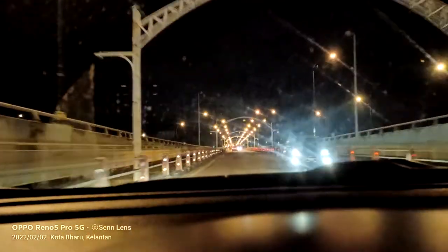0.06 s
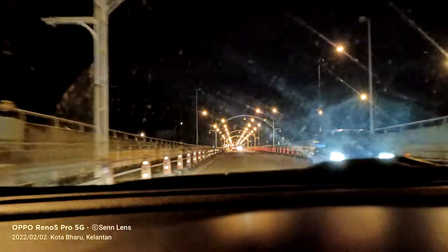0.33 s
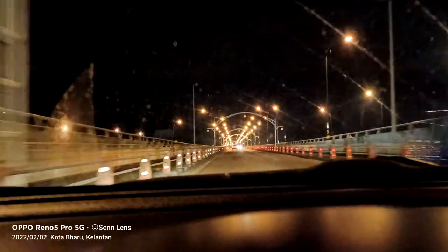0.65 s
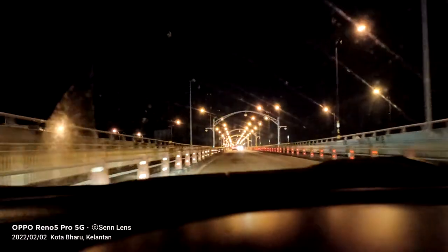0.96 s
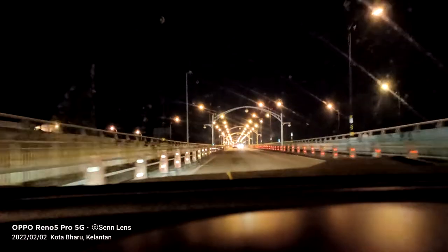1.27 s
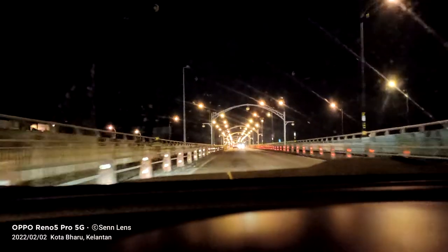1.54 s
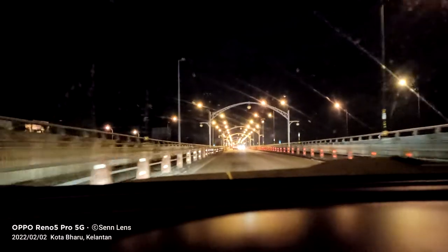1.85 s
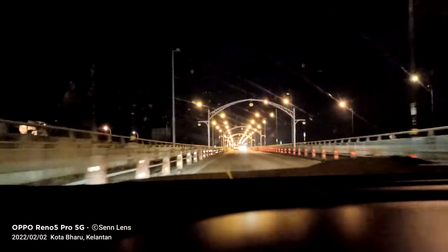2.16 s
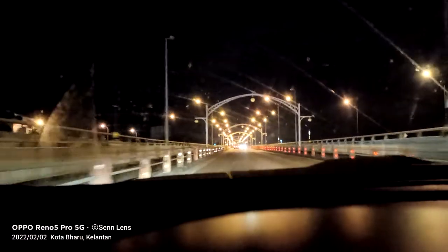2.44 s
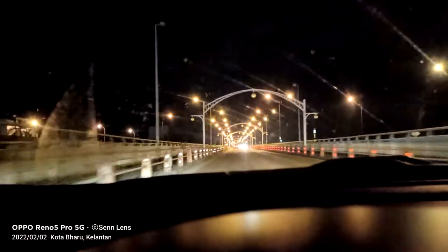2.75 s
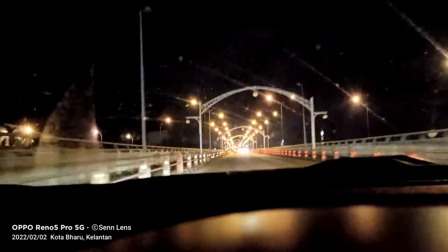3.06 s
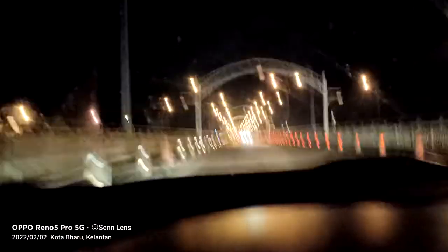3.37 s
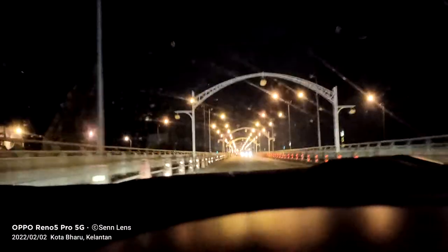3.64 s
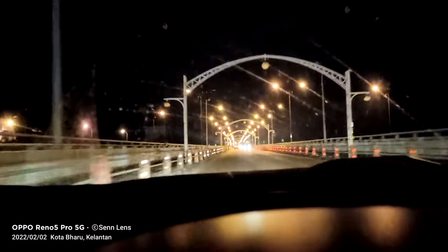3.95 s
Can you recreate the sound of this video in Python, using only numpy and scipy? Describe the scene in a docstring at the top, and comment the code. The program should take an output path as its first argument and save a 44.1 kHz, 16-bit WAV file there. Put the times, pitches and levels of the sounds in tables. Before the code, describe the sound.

A car's steady road and engine rumble from inside, with fluttering, popping wind on the microphone.

```python
"""Inside a car cruising over a bridge at night, heard through two microphone ports in the cabin.
Road, engine and air make a deep rumble. Right at the microphone a draught buffets each port
separately, with fluttering eddies and sharp pops. A bright hiss rings off glass and trim for
the first half second; brief swishes, scrapes and a faint squeak come later."""
import sys
import numpy as np
from scipy import signal
from scipy.fft import rfft, irfft
from scipy.io import wavfile
from scipy.ndimage import uniform_filter1d, minimum_filter1d

SR = 44100
rng = np.random.default_rng(int(sys.argv[2]) if len(sys.argv) > 2 else 0)


def put_to_file(sound):
    """Save the sound as 16-bit audio at rate SR, in the file named by the first command-line argument."""
    columns = np.atleast_2d(sound).T  # one column per channel
    safe = np.clip(columns, -1, 1)
    whole_steps = np.round(safe * 32767)
    wavfile.write(sys.argv[1], SR, whole_steps.astype(np.int16))


N = 176400
T = np.arange(N) / SR
HZ = np.maximum(np.arange(N // 2 + 1) * SR / N, 1)

# steady air noise: f/Hz, level/dB per Hz
AIR_SPECTRUM = [(800, -79), (2500, -83), (4000, -93), (6000, -93), (8000, -100), (9500, -111),
                (11000, -120), (15500, -131)]
# road, engine and air rumble: f/Hz, level/dB per Hz
RUMBLE_SPECTRUM = [(10, -51), (22, -39.5), (33, -38), (55, -33.5), (100, -32), (175, -33.5), (280, -41),
                   (450, -49.5), (900, -67), (2000, -78.5), (5000, -115)]
# low swells of the car body: t/s, half length/s, f/Hz, level/dB
BODY_BOOMS = [(1.067, 0.028, 112, -15.5), (1.884, .13, 52.16, -14), (3.308, 0.024, 176.4, -15.5),
              (3.525, 0.065, 55, -12)]
# swells of the squeak: t/s, half length/s, level/dB
SQUEAK_EVENTS = [(1.54, .025, -85), (3.745, 0.035, -70), (3.8, .018, -80)]
# rising scrapes: t/s, half length/s, centre f/Hz, rise/Hz per s, level/dB
SCRAPE_EVENTS = [(0.748, .032, 2810, 3960, -42.5), (0.762, 0.022, 3900, 15000, -50),
                 (0.771, 0.019, 1750, 2000, -37), (1.095, 0.032, 3510, 3930, -53)]
# colour common to the swishes: f/Hz, level/dB
SWISH_SPECTRUM = [(900, -78.5), (2000, -58.5), (3500, -67.5), (5200, -66.5), (7000, -74), (9000, -83.5),
                  (11000, -83.5), (15500, -88)]
# single swishes: t/s, half length/s, gain/dB, tilt/dB per octave
SWISH_EVENTS = [(0.834, .012, -22.5, 5), (0.928, .008, -30, 6), (3.309, .021, -18.5, -0.5),
                (3.363, 0.017, -15.5, -6), (3.492, 0.038, -7.5, -1), (3.51, 0.0084, -5, -1.5),
                (3.673, 0.015, -16, -0.5), (3.788, .022, -18.5, -4)]
# colour of the hiss: f/Hz, level/dB
HISS_SPECTRUM = [(900, -84), (1900, -71), (2200, -63.5), (2550, -59), (3700, -66.5), (4500, -63),
                 (5400, -58), (6500, -71.5), (8000, -71.5), (9500, -74), (10300, -85), (12500, -87.5),
                 (15500, -95.5)]
# narrow tones ringing in the hiss: f/Hz, level/dB
RINGING_TONES = [(2094, -47), (2482, -40), (2617, -43.5), (2771, -41.5), (2938, -48.5), (3983, -51),
                 (4253, -43.5), (4805, -43), (5197, -44.5), (5243, -43.5), (5414, -39.5), (5675, -48),
                 (6066, -51.5), (7331, -46.5), (8048, -50), (9212, -51.5), (9641, -52.5)]
# course of the hiss and its tones: t/s, gain/dB
HISS_ENVELOPE = [(0, 2), (.1, 0), (.24, 1.5), (.345, 2), (.39, -10), (.455, -13.5), (.49, -33), (.53, -72)]
# colour of the draught: f/Hz, level/dB
DRAUGHT_SPECTRUM = [(60, -58.5), (170, -43.5), (300, -41.5), (500, -48), (900, -54), (1400, -63.5),
                    (2100, -71), (3000, -82), (4500, -94), (7000, -112), (12000, -135)]
# strength of the draught: t/s, gain/dB
GUST_ENVELOPE = [(0, -6), (.3, 2.5), (.45, 0.5), (.62, -0.5), (.9, 0), (1.15, 0), (1.38, 0), (1.6, -1),
                 (1.82, 4), (2.05, -1), (2.3, 1), (2.6, -2), (2.82, 2), (3.1, 0.5), (3.42, 1.5),
                 (3.68, -3.5), (4, 3.5)]
# colour common to the pops: f/Hz, level/dB
POP_SPECTRUM = [(60, -8.5), (300, -4), (900, 5), (1800, -4), (3000, -16), (4500, -32), (7000, -44),
                (14000, -71.5)]
# hard eddies hitting the ports: t/s, relative peak/dB, left minus right/dB, tilt/dB per octave
POP_EVENTS = [(0.516, -16, -2, -1), (0.541, -15, -7, -4), (0.608, -15, -10, -3), (0.629, -11, -8.5, -3),
              (0.789, -13, -11, -3.5), (0.821, -12, -10, -4), (0.84, -8, 1, -1), (0.96, -15, 12, -2.5),
              (0.969, -13.5, 8, -1), (1.109, -15, 8.5, -2.5), (1.239, -16, 13, -8), (1.256, -16, 9, -8),
              (1.346, -11.5, -2, 0.5), (1.358, -10.5, 12, -4), (1.373, -10.5, 3, 1.5),
              (1.715, -15, -10, -1), (1.737, -14, 10, 1), (1.805, -15, -12, -3), (1.833, -7, 17, -0.5),
              (1.948, -8, -9, -1), (1.998, -19, 10, -6), (2.021, -7.5, -8, -4), (2.026, -6.5, 12, -5),
              (2.041, -15, -12, -2), (2.058, -13.5, 9, 1), (2.209, -11.5, -19, 0.5), (2.383, -7.5, 1, -3.5),
              (2.543, -12, -10, -3.5), (2.69, -13, -11, -3), (2.775, -12, -19, -1.5),
              (2.809, -14.5, -12, -2), (2.873, -10, -4, 0), (2.909, -13, 9, -2.5), (3.008, -13.5, 7, 1),
              (3.064, -15.5, -13.5, 4.5), (3.204, -13, -9, -9.5), (3.223, -10.5, -14, -3),
              (3.262, -14.5, 2, -5), (3.421, -6, 1.5, -4), (3.567, -7, -16, 0.5), (3.592, -4.5, 11, 3.5),
              (3.653, -5, 11, -4)]
# treble response of the microphone ports: f/Hz, left gain/dB, right gain/dB
PORT_RESPONSE = [(2000, -1.5, -1), (4500, -1, 3), (5770, -10, 5.5), (6200, -5, 1), (6400, -22, -1),
                 (7150, 2, -9), (8200, 3, -21), (10000, -1, -9.5), (13500, -3, -6), (15500, -12, 6)]


def undb(db):
    """Decibels to gain."""
    return 10 ** (np.asarray(db) / 20)


def noise():
    """Independent white noise for each port, 0 dB per Hz."""
    return rng.standard_normal((2, N)) * np.sqrt(SR / 2)


def colour(x, points):
    """Filter by points of f/Hz, gain/dB."""
    hz, db = np.array(points).T
    return irfft(rfft(x) * undb(np.interp(np.log(HZ), np.log(hz), db)), N)


def envelope(points):
    """Gain along points of t/s, gain/dB."""
    return undb(np.interp(T, *np.array(points).T))


def swell(at, half_s):
    """A bell-shaped rise and fall."""
    return np.exp(-.5 * np.minimum(abs(T - at) / half_s, 10) ** 2)


def pan(left_minus_right_db):
    """Gains of the two ports for a level difference."""
    gains = undb(np.array([[left_minus_right_db], [-left_minus_right_db]]) / 2)
    return gains / gains.mean()


def wander(per_s):
    """Smooth random motion of unit spread for each port."""
    motion = irfft(rfft(noise()) * np.exp(-(2 * HZ / per_s) ** 2) * HZ / (HZ + 2), N)
    return motion / motion.std()


def air():
    """Steady, faint air noise behind everything."""
    return colour(noise(), AIR_SPECTRUM)


def rumble(shared_below_hz=50):
    """Road, engine and air rumble; only the deepest bass is alike at both ports."""
    shared = 0.9 / (1 + (HZ / shared_below_hz) ** 4)
    spectrum = rfft(noise()) * np.sqrt(1 - shared) + rfft(noise()[0]) * np.sqrt(shared)
    return colour(irfft(spectrum, N), RUMBLE_SPECTRUM)


def body_booms():
    """The car body booms now and then: low swells of wavering pitch."""
    drift_s = 0.0853 * np.cumsum(wander(per_s=9.87)[0]) / SR
    return sum(undb(db) * swell(at, half_s) * np.sin(2 * np.pi * hz * (T + drift_s))
               for at, half_s, hz, db in BODY_BOOMS)


def squeak(hz=11217, width_hz=14):
    """A thin, faint squeak in the cabin: a very narrow band of noise that comes and goes."""
    tone = irfft(rfft(noise()) * np.exp(-((HZ - hz) / width_hz) ** 2), N)
    return tone / tone.std() * sum(undb(db) * swell(at, half_s) for at, half_s, db in SQUEAK_EVENTS)


def scrapes(width_hz=430):
    """Soft scrapes in the cabin, each friction noise around a rising resonance."""
    friction = np.sqrt(2) * wander(2 * width_hz)
    out = np.zeros((2, N))
    for at, half_s, hz, rise, db in SCRAPE_EVENTS:
        phase = 2 * np.pi * (hz * (T - at) + rise * (T - at) ** 2 / 2)
        out += friction * np.sin(phase) * undb(db) * swell(at, half_s)
    return out


def swishes(flicker_db=3.4):
    """Brief swishes in the cabin: noise made scratchy by a fast flicker in level."""
    scratch = rfft(colour(noise(), SWISH_SPECTRUM) * undb(flicker_db * wander(per_s=350)[0]))
    octaves = np.log2(np.maximum(HZ, 1000) / 4000)
    return sum(irfft(scratch * undb(tilt_db * octaves), N) * undb(db) * swell(at, half_s)
               for at, half_s, db, tilt_db in SWISH_EVENTS)


def cabin(x, ring_s=.035, wet=0.9, windscreen_s=.0031, windscreen_db=-16.5):
    """Dense short reflections from glass and trim, with a first echo off the windscreen."""
    tail = noise() * np.exp(-T / ring_s)
    tail /= np.sqrt(np.sum(tail ** 2, axis=1, keepdims=True))
    ringing = irfft(rfft(x) * (np.sqrt(1 - wet) + np.sqrt(wet) * rfft(tail)), N)
    echo_gain = undb(windscreen_db)
    echo = echo_gain * np.roll(ringing, int(windscreen_s * SR), axis=1)
    return (ringing + echo) / (1 + echo_gain / 2)


def hiss(tone_width_hz=21):
    """A bright hiss with narrow ringing tones echoes in the cabin and drops away in two steps."""
    broadband = colour(cabin(noise()[0]), HISS_SPECTRUM)
    peaks = sum(undb(db) * np.maximum(1 - abs(HZ - hz) / tone_width_hz, 0) for hz, db in RINGING_TONES)
    tones = irfft(rfft(noise()) * peaks, N) / np.sqrt(tone_width_hz)
    return (broadband + tones) * envelope(HISS_ENVELOPE)


def draught(flurry_limit_db=13):
    """Turbulence right at the ports, in flurries of slow flutter and fast eddies; the higher bands swing
    further in level."""
    flutter, eddies = 5 * wander(per_s=49), 4.5 * wander(per_s=287)
    flurry_db = flurry_limit_db * np.tanh((flutter + eddies) / flurry_limit_db)
    spectrum = rfft(colour(noise(), DRAUGHT_SPECTRUM))
    out = np.zeros((2, N))
    for hz in 125 * 2. ** np.arange(-1, 6):
        octave_band = irfft(spectrum * np.maximum(1 - abs(np.log2(HZ / hz)), 0), N)
        depth = (min(hz, 2600) / 1000) ** 0.2  # higher bands swing further
        gain = undb(depth * flurry_db)
        out += octave_band * gain / np.sqrt(np.mean(gain ** 2))
    return out * envelope(GUST_ENVELOPE) * pan(left_minus_right_db=-3.5)


def pops(decay_s=0.00316, roughness=0.54, lift_db=2):
    """Single hard eddies, mostly on one port: a pressure spike in a ragged wake of a few milliseconds."""
    size = 4096
    age, hz = T[:size], np.maximum(np.arange(size // 2 + 1) * SR / size, 1)
    points_hz, points_db = np.array(POP_SPECTRUM).T
    colour_db = np.interp(np.log(hz), np.log(points_hz), points_db)
    out = np.zeros((2, N))
    for at, db, side_db, tilt_db in POP_EVENTS:
        pressure = rng.standard_normal((2, size)) * age * np.exp(-2 * age / decay_s)  # the wake
        pressure *= roughness / np.linalg.norm(pressure, axis=1, keepdims=True)
        pressure[:, int(decay_s * SR / 2)] += 1  # the spike, at the crest of the wake
        spectrum = rfft(np.roll(pressure, size // 2, axis=1))
        skew = np.exp(2j * np.pi * rng.random((2, 1)))  # a random phase makes the spike lopsided
        response = undb(colour_db + tilt_db * np.log2(hz / 1000))
        pop = irfft(spectrum * skew * response, size) * np.hanning(size)
        pop /= abs(pop).max(axis=1, keepdims=True)
        start = int(at * SR) - size // 2
        out[:, start:start + size] += pop * undb(db + lift_db) * pan(side_db)
    return out


def scene():
    """Everything that reaches the two microphone ports."""
    return rumble() + body_booms() + draught() + pops() + hiss() + swishes() + scrapes() + squeak() + air()


def record(dry):
    """The microphone: each port colours the treble, a limiter rounds the peaks and the top is cut."""
    ceiling, top_hz = .9, 15750
    ports = np.array(PORT_RESPONSE)
    picked_up = np.array([colour(dry[0], ports[:, [0, 1]]), colour(dry[1], ports[:, [0, 2]])])
    allowed_gain = np.minimum(1, ceiling / (abs(picked_up) + 1e-9))
    held_gain = minimum_filter1d(allowed_gain, size=600)
    smooth_gain = uniform_filter1d(uniform_filter1d(held_gain, size=300), size=300)
    lowpass = signal.ellip(10, .2, 80, top_hz, fs=SR, output="sos")
    return signal.sosfilt(lowpass, picked_up * smooth_gain)


dry = scene()
out = record(dry)
put_to_file(out)
```